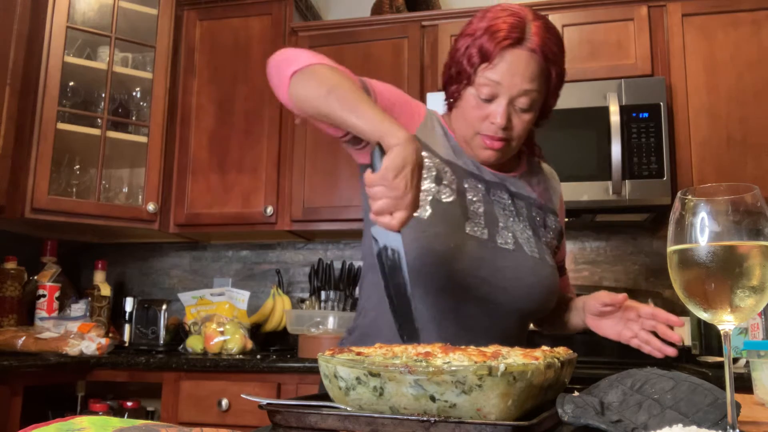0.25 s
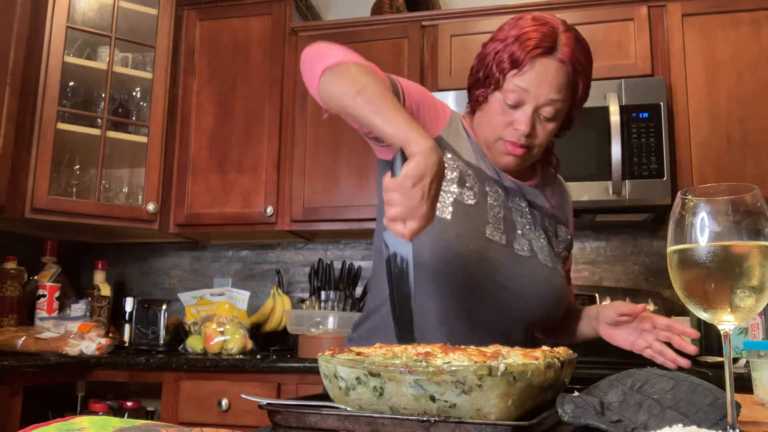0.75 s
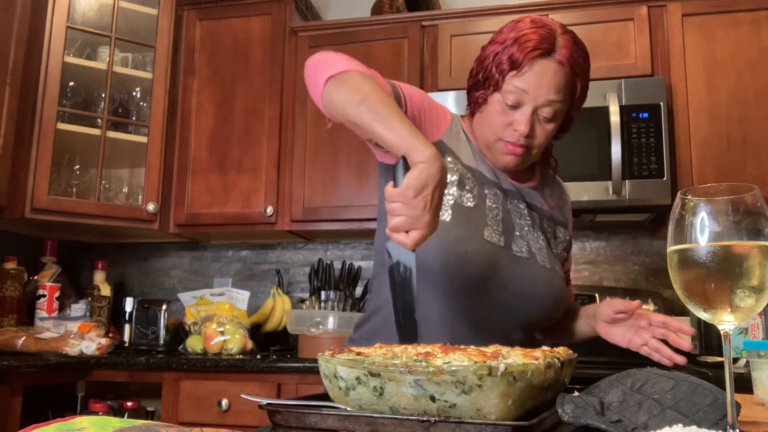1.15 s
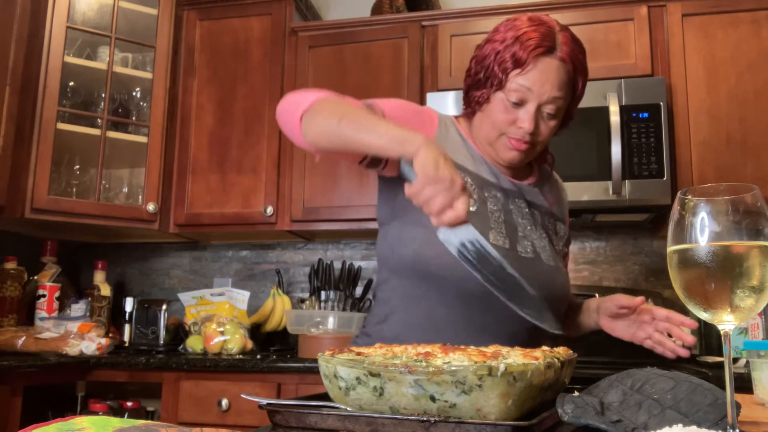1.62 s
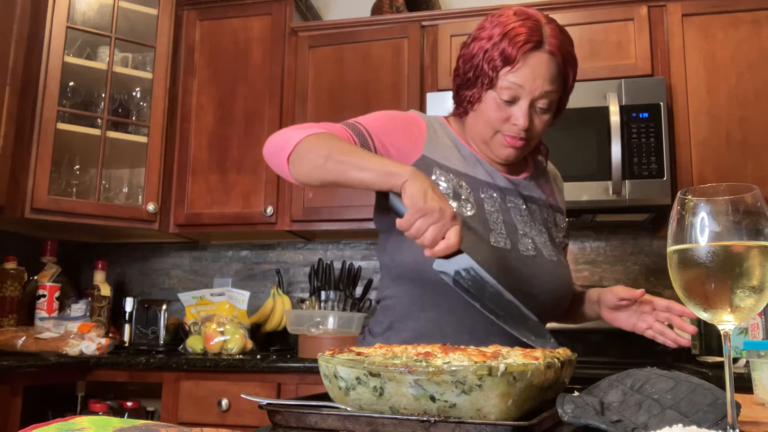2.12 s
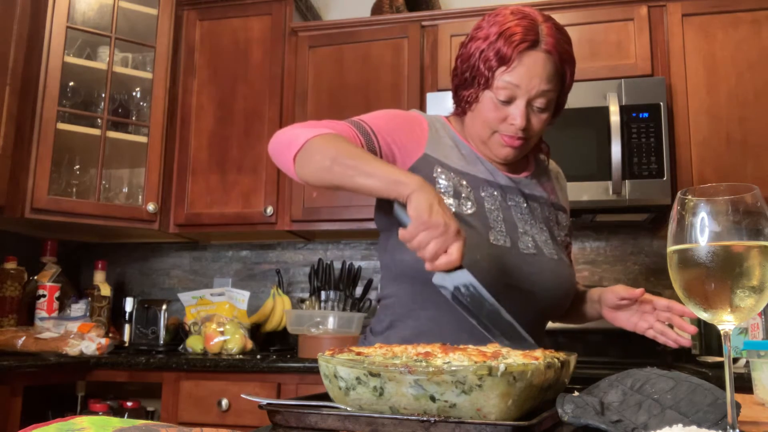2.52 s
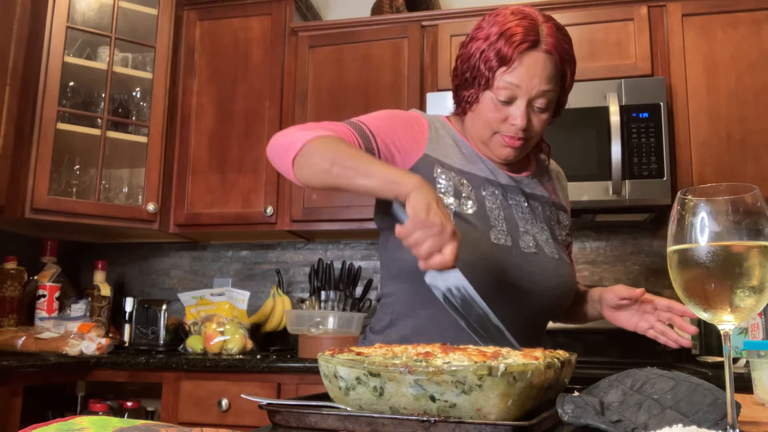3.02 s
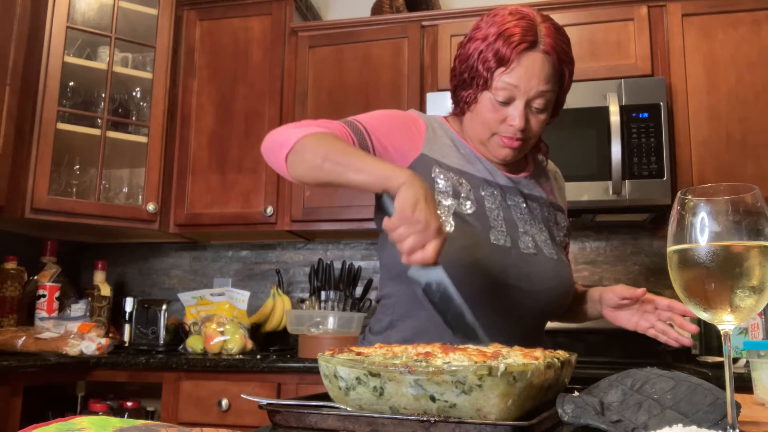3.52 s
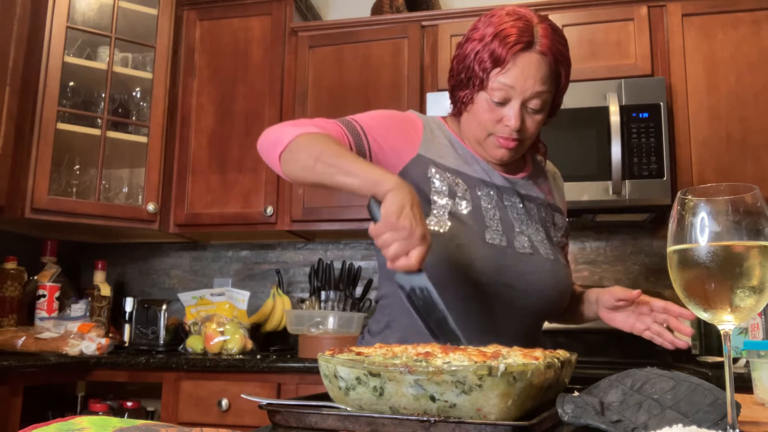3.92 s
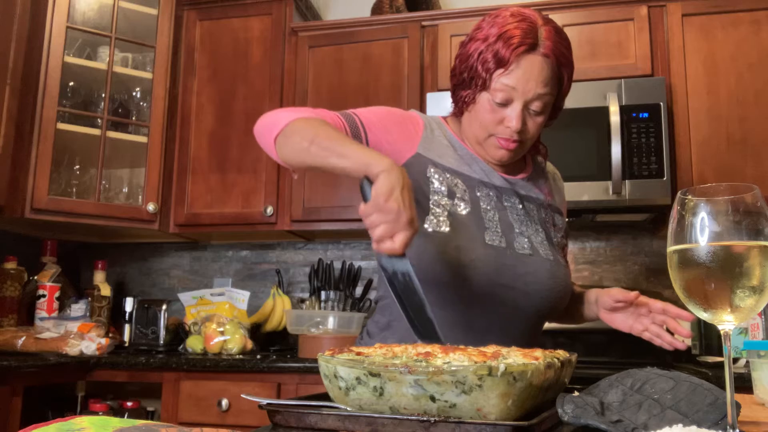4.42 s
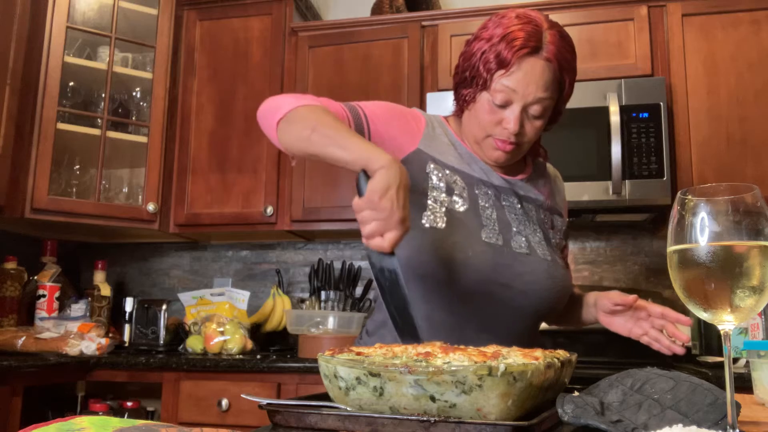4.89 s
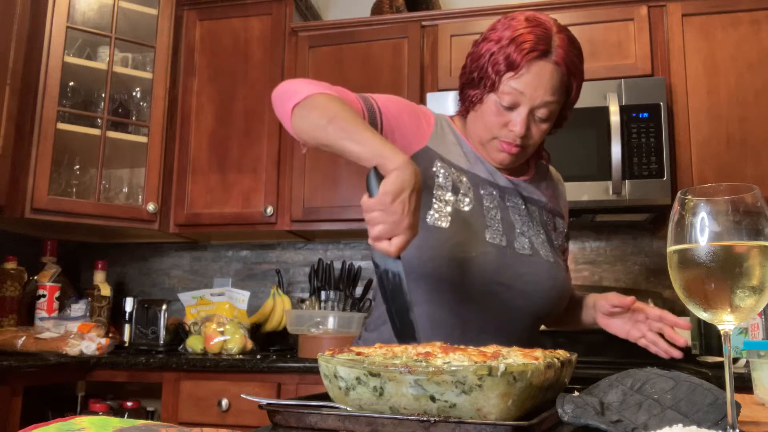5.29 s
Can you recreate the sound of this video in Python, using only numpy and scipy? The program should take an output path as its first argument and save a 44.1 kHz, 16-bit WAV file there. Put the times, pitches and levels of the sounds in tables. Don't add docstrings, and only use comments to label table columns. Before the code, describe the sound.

In a small hard-walled kitchen, a phone microphone near the counter picks up a large knife going through a baked dish. The ring of a knock just before the start is dying away, with a small crust tear around 0.1 s. A faint tap at 0.35 leads to a firm knock at 0.5. From 0.83 to 1.34 come uneven clustered knocks, with blade scrapes on glass and tiny wet squeaks. After a pause, clearer single stabs fall at 1.93 and 2.37, then the heaviest, deep thuds at 2.9 and 3.3. Steady chops follow at 3.64, 4.0, 4.37 and 4.68, each a short damped glass-and-tray clunk with crust crunch and brief chatter. Faint rustling comes after 2.0 and near 5.0 to 5.5. Weaker quick taps and a short drag close it at 5.3 to 5.46. Echoes and a short room tail follow the blows, over low room noise and faint fridge hum.

```python
import sys
import numpy as np
from scipy import signal
from scipy.fft import rfft, irfft, next_fast_len
from scipy.io import wavfile
from scipy.ndimage import uniform_filter1d

SR = 44100
rng = np.random.default_rng(int(sys.argv[2]) if len(sys.argv) > 2 else 0)


def volts_from_db(level):
    exponent = np.asarray(level, float) / 20
    return 10 ** exponent


def digitize_waveform(pressure):
    field = np.atleast_2d(pressure).T
    bounded = np.clip(field, -1, 1)
    quanta = np.round(bounded * 32767).astype(np.int16)
    wavfile.write(sys.argv[1], SR, quanta)


N = 244755
LEAD = 2048

# (frequency [Hz], level per Hz [dB])
ROOM_COLOUR = [(15, -77.5), (25, -34), (37, -30.5), (85, -3.5), (161, -13), (185, -9.5), (297, -4),
               (413, -15.5), (444, -10), (589, -15), (678, -20), (2010, -26.5), (2260, -30), (7000, -46),
               (9100, -77), (15400, -120)]
HISS_COLOUR = [(5000, -19), (7000, -9.5), (9500, -14), (12000, -7.5), (14500, -2), (16000, -2),
               (16500, -34)]
ROOM_DB, HISS_DB = -56.5, -84.5
# (frequency [Hz], width [Hz], level [dB])
FRIDGE_HUM = [(94, 6.9, -82), (195, 15, -76.5)]

# (frequency [Hz], t60 [s], level [dB])
KITCHEN_TAIL = [(149, 0.16, 9), (406, 0.48, -4), (1000, 0.72, -3), (2630, 0.7, 0), (6900, 0.68, -1.5),
                (14000, 0.14, 1)]
ECHO_S = [.0045, .012, .0235]
ECHO_DB = [-18.5, -9, -15]
TAIL_BUILD_S = 0.011

# (start [s], length [s], level [dB])
RUSTLE = [
    (2.04, 0.34, -60.5),
    (4.95, 0.11, -59.5),
    (5.17, 0.33, -61),
]
# (frequency [Hz], level per Hz [dB])
RUSTLE_COLOUR = [(1200, -20), (2000, 4.5), (3700, 0), (5000, -2), (6500, -28), (7500, -42)]
RUSTLE_GAIN_DB, RUSTLE_RELEASE_S = 3, 0.22

# (time [s], length [s], frequency [Hz], width [Hz], level [dB])
SQUEAKS = [
    (0.33, 0.011, 3800, 1500, -59.5),
    (0.673, 0.077, 13400, 2500, -72),
    (0.855, 0.041, 8700, 6030, -65.5),
    (1.013, 0.0036, 14300, 3000, -55),
    (1.437, 0.031, 12700, 1200, -70),
    (1.9964, 0.0017, 11900, 8000, -61),
    (3.925, 0.097, 6200, 900, -74),
]

# (start [s], length [s], level [dB])
TEAR = [
    (0.0, 0.0017, -62.5),
    (0.085, 0.031, -61),
    (0.675, 0.049, -76),
    (1.432, 0.012, -86),
]
# (frequency [Hz], level per Hz [dB])
TEAR_COLOUR = [(1180, 11), (2000, 7), (2160, 4), (2690, 6), (2910, 1.5), (4610, 4.5), (9920, -9.5),
               (13200, -4), (16000, -6)]
CRUNCH_COLOUR = [(4000, -35), (6000, 1.5), (7500, -3), (9500, -7.5), (12000, -7.5), (14500, -2.5),
                 (16000, -14.5), (16500, -38)]
TEAR_GAIN_DB, TEAR_RELEASE_S = 2.5, 0.17
CRUNCH_UNDER_TIP_DB = -13.5

# (frequency [Hz], level per Hz [dB])
CHATTER_COLOUR = [(410, -29), (700, -2.5), (1020, -6), (1250, -5), (1670, -3), (2250, -18), (2450, -14.5),
                  (2860, -19), (5890, -23.5), (7000, -43), (9100, -84), (15400, -120)]

# (start [s], length [s], end level [dB], change [dB])
DRAG = [
    (0.832, 0.061, -35.5, 1.5),
    (1.012, 0.057, -43.5, -7.5),
    (1.165, 0.06, -42, -1.5),
    (5.31, 0.021, -42.5, -12),
    (5.415, 0.049, -40, 4),
]
DRAG_RELEASE_S = 0.022

# (time [s], tray thud [dB], glass bottom [dB], blade tip [dB], pitch favoured where the tip lands [Hz])
KNOCKS = [(0.348, -46.5, -64, -64, 860), (0.5, -24.5, -36.5, -42.5, 1420), (0.833, -42, -47.5, -58, 1720),
          (0.883, -27, -44, -40, 1000), (0.992, -31, -30, -44.5, 1500), (1.2, -38, -40.5, -53, 1710),
          (1.222, -28, -55, -43.5, 900), (1.32, -28.5, -29, -51, 1705), (1.342, -44, -39, -50.5, 1760),
          (1.926, -24, -30.5, -49, 740), (2.37, -21.5, -37.5, -88, 855), (2.904, -9.5, -25, -41.5, 780),
          (3.314, -10, -28.5, -37.5, 1038), (3.644, -19, -31, -38, 1298), (4.015, -23.5, -33, -41, 1333),
          (4.369, -20, -34, -36.5, 1240), (4.68, -18, -30, -35, 1327), (5.294, -27, -23, -44, 1740),
          (5.359, -34.5, -36, -47.5, 1000), (5.46, -39, -43.5, -55.5, 1370)]
FIRST_S = -0.022
FIRST_KNOCK = (FIRST_S, -22, -34.5, -41, 1550)
WALL_FROM_THUD, WALL_DB = 0.27, -5.5
SECOND_PEAK_S, SECOND_PEAK_DB = 0.013, 3.5

# (frequency [Hz], level [dB], t60 [s])
MODES = [(120, -25.5, 0.14), (202.5, -34, 0.12), (251.3, -21.5, 0.077), (309, -9, 0.017),
         (410.8, 4.5, 0.019), (523, -4, 0.11), (608, -8.5, 0.086), (781.4, -2, 0.058), (899, 5, 0.029),
         (942.6, -1, 0.18), (1045, -10, 0.063), (1005, -17.5, 0.14), (1117, -0.5, 0.078),
         (1256.6, 9.5, 0.014), (1385.6, -6.5, 0.063), (1500, -7, 0.079), (1614, 1, 0.034),
         (1726, -7.5, 0.07), (1917, 4.5, 0.013), (2320, -9, 0.01), (2425, 0, 0.014), (2700, -8, 0.009),
         (3230, -5.5, 0.023), (3530, -3.5, 0.065), (3740, -4.5, 0.045), (4615, 1, 0.016),
         (4550, -26.5, .03), (5500, -39, 0.12), (6030, -9, 0.008)]
PART_HZ = [420, 800, 1400, 4200]
LONGEST_T60_S = [.1, .05, .04, .013]
FAVOUR_DB, FAVOUR_OCTAVES = 9, 0.1
TRAY_TOP_HZ, TRAY_LAG_S = 700, 0.00225


def rms_one(x):
    return x / np.sqrt(np.mean(x ** 2) + 1e-20)


def at_hz(points, hz, column=1):
    rows = np.array(points)
    return np.interp(np.log(hz), np.log(rows[:, 0]), rows[:, column])


def highpass(x, hz):
    return signal.sosfilt(signal.butter(2, hz, "high", fs=SR, output="sos"), x)


def coloured(x, spectrum):
    size = next_fast_len(len(x))
    hz = np.maximum(np.arange(size // 2 + 1) * SR / size, 1)
    shaped = irfft(rfft(x, size) * volts_from_db(at_hz(spectrum, hz)), size)
    return rms_one(shaped[:len(x)])


def ring(clicks, hz, t60):
    r = volts_from_db(-60 / (t60 * SR))
    w = 2 * np.pi * hz / SR
    return signal.lfilter([0, np.sin(w)], [1, -2 * r * np.cos(w), r * r], clicks + 1e-18)


def swell(clicks, hz, turns):
    r = np.exp(-hz / (turns * SR))
    w = 2 * np.pi * hz / SR
    gain = (1 - r * r) / 2
    return signal.lfilter([gain, 0, -gain], [1, -2 * r * np.cos(w), r * r], clicks)


def grains(per_s, spread_db):
    sizes = volts_from_db(spread_db * np.minimum(rng.exponential(1, N + LEAD), 5))
    sizes = sizes * rng.choice([-1, 1], N + LEAD)
    return rms_one(sizes * (rng.random(N + LEAD) < per_s / SR))


def strokes(rows, release_s, change_db=None):
    t = (np.arange(N + LEAD) - LEAD) / SR
    gain = 0
    for s, length_s, db, *own_db in rows:
        left = t - s - length_s
        during = (own_db or [change_db])[0] * np.maximum(left / length_s, -1)
        after = np.maximum(-60 * left / release_s, -200)
        gain = gain + (t >= s) * volts_from_db(db + np.where(left < 0, during, after))
    return uniform_filter1d(gain, size=128)


def bursts(times_s, levels_db, rise_s, t60):
    clicks = np.zeros(N + LEAD)
    clicks[np.round(times_s * SR).astype(int) + LEAD] = volts_from_db(levels_db)
    dying = signal.lfilter([1], [1, -volts_from_db(-60 / (t60 * SR))], clicks + 1e-18)
    rise = np.exp(-1 / (rise_s * SR))
    return signal.lfilter([1 - rise], [1, -rise], dying)


def knock_levels():
    s, thud_db, bottom_db, tip_db, place_hz = np.transpose([FIRST_KNOCK] + list(KNOCKS))
    wall_db = WALL_FROM_THUD * thud_db + (1 - WALL_FROM_THUD) * bottom_db + WALL_DB
    return s, np.transpose([thud_db, wall_db, bottom_db, tip_db]), place_hz


def background():
    out = volts_from_db(ROOM_DB) * coloured(rng.standard_normal(N), ROOM_COLOUR)
    out = out + volts_from_db(HISS_DB) * coloured(rng.standard_normal(N), HISS_COLOUR)
    for hz, width_hz, db in FRIDGE_HUM:
        hum = ring(rng.standard_normal(N + SR), hz, 2.8 / width_hz)
        out = out + volts_from_db(db) * rms_one(hum[SR:])
    return out


def kitchen(x, wet_db=-1.0, changing=0.56):
    t = np.arange(SR * 3 // 4) / SR
    step = SR // 4
    white = rng.standard_normal((2, 2 * SR))
    edges = 100 * 2 ** np.arange(0, 7.6, 0.5)
    centres = np.sqrt(edges[1:] * edges[:-1])[:, None]
    bands = []
    for k in range(len(centres)):
        band = signal.butter(2, edges[k:k + 2], "band", fs=SR, output="sos")
        bands.append(signal.sosfilt(band, white[k % 2]))
    bands = np.array(bands)
    tail_db = at_hz(KITCHEN_TAIL, centres, column=2) - 60 * t / at_hz(KITCHEN_TAIL, centres)
    dying = volts_from_db(tail_db + wet_db - 33.0) * (1 - np.exp(-t / TAIL_BUILD_S))

    early = np.zeros(len(t))
    early[0] = 1
    for s, db in zip(ECHO_S, ECHO_DB):
        early[round(s * SR)] = volts_from_db(db)
    share = np.clip(changing, 0, 1)
    lasting = early + np.sqrt(1 - share) * np.sum(bands[:, :len(t)] * dying, axis=0)

    padded = np.pad(x, (step, 2 * step))
    out = np.zeros(len(x) + 2 * SR)
    fade = signal.windows.hann(2 * step, sym=False)
    for start in range(0, len(x) + step, step):
        skip = rng.integers(1, SR)
        own_tail = np.sum(bands[:, skip:skip + len(t)] * dying, axis=0)
        response = lasting + np.sqrt(share) * own_tail
        heard = signal.fftconvolve(padded[start:start + 2 * step] * fade, response)
        out[start:start + len(heard)] += heard
    return out[step + LEAD:step + LEAD + N]


def rustle():
    envelope = strokes(RUSTLE, RUSTLE_RELEASE_S, RUSTLE_GAIN_DB)
    return volts_from_db(-13.0) * envelope * coloured(grains(6600.0, 3.0), RUSTLE_COLOUR)


def squeaks():
    out = np.zeros(N + LEAD)
    t = (np.arange(N + LEAD) - LEAD) / SR
    for s, length_s, hz, width_hz, db in SQUEAKS:
        hiss = ring(grains(4600.0, 3.8), hz, 2.5 / width_hz)
        hiss = rms_one(ring(hiss, hz, 1.0 / width_hz))
        out += volts_from_db(db) * hiss * np.sin(np.pi * np.clip((t - s) / length_s, 0, 1))
    return out


def tearing():
    envelope = strokes(TEAR, TEAR_RELEASE_S, TEAR_GAIN_DB)
    return volts_from_db(13.0) * envelope * coloured(grains(8900.0, 5.3), TEAR_COLOUR)


def crunch(level_db=-15.0):
    s, parts_db, _ = knock_levels()
    db = parts_db[:, -1] + CRUNCH_UNDER_TIP_DB + level_db
    envelope = bursts(np.r_[s, s + SECOND_PEAK_S], np.r_[db, db + SECOND_PEAK_DB], rise_s=0.001, t60=0.22)
    return envelope * coloured(grains(2900.0, 2.6), CRUNCH_COLOUR)


def chatter(level_db=7.5):
    s, parts_db, _ = knock_levels()
    envelope = bursts(s, parts_db[:, -1] + level_db, rise_s=0.003, t60=0.14)
    return envelope * coloured(grains(4000, 3.8), CHATTER_COLOUR)


def dish(touch_db=-26.0):
    s, parts_db, place_hz = knock_levels()
    at = np.round(s * SR).astype(int) + LEAD
    chance = rng.standard_normal((len(at), len(MODES)))
    drag = strokes(DRAG, DRAG_RELEASE_S) * grains(1100.0, 1.1)
    drag_db = [-29.5, -29.5, -32.5, -55]
    knock_db = [0.5, 0.0, 2.0, -4.0]
    contact_turns = [0.9, 0.7, 1.3, 4.0]
    spread_db = [1.0, 1.5, 1.5, 2.5]
    ahead = round(0.007 * SR)
    second_peak = round(SECOND_PEAK_S * SR)
    out = 0
    for k, (hz, level_db, t60) in enumerate(MODES):
        weights = np.array([np.interp(np.log(hz), np.log(PART_HZ), one) for one in np.eye(4)])
        clicks = volts_from_db(weights @ drag_db) * np.roll(drag, 37 * k)
        sign = 1 if 1000 < hz < 2000 else (-1) ** k
        blows_db = (parts_db + knock_db) @ weights + weights @ spread_db * chance[:, k]
        octaves_off = np.log2(hz / place_hz)
        favour_db = FAVOUR_DB * np.exp(-(octaves_off / FAVOUR_OCTAVES) ** 2)
        blows = sign * volts_from_db(blows_db) * volts_from_db(favour_db)
        lag = round((hz < TRAY_TOP_HZ) * TRAY_LAG_S * SR)
        clicks[at + lag] += blows
        clicks[at + second_peak] += volts_from_db(SECOND_PEAK_DB) * weights[3] ** 2 * blows * chance[::-1, k]
        clicks[at - ahead] += volts_from_db(touch_db) * (weights[0] + weights[1]) * blows
        rung = ring(clicks, hz, min(t60, weights @ LONGEST_T60_S))
        out = out + volts_from_db(level_db) * swell(rung, hz, weights @ contact_turns)
    return out


def scene():
    struck = highpass(dish() + chatter(), 95.0)
    at_the_dish = struck + crunch() + tearing() + squeaks() + rustle()
    return (kitchen(at_the_dish) + background())[None]


def roll_off(x):
    return signal.sosfilt(signal.butter(12, 16430, fs=SR, output="sos"), x)


def record(dry):
    mix = highpass(dry, 75.0)
    return roll_off(mix)


dry = scene()
out = record(dry)
digitize_waveform(out)
```